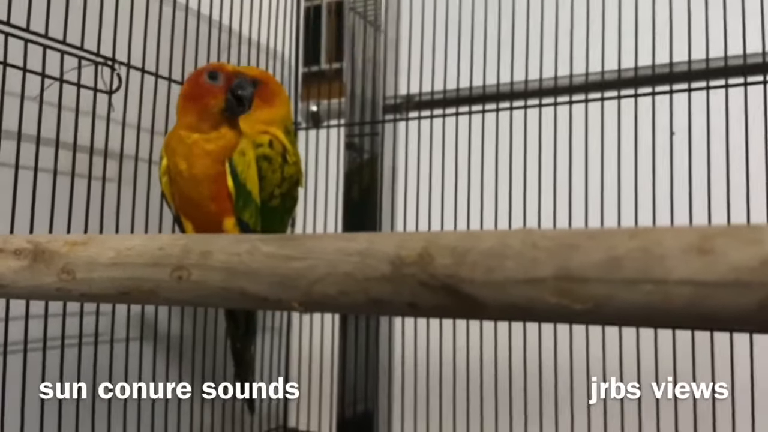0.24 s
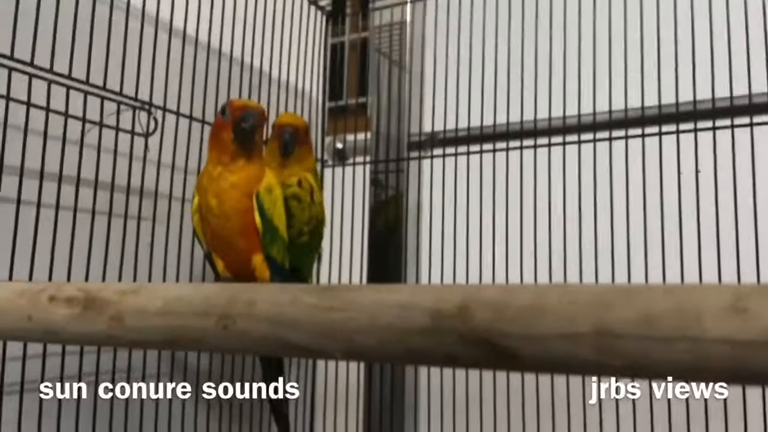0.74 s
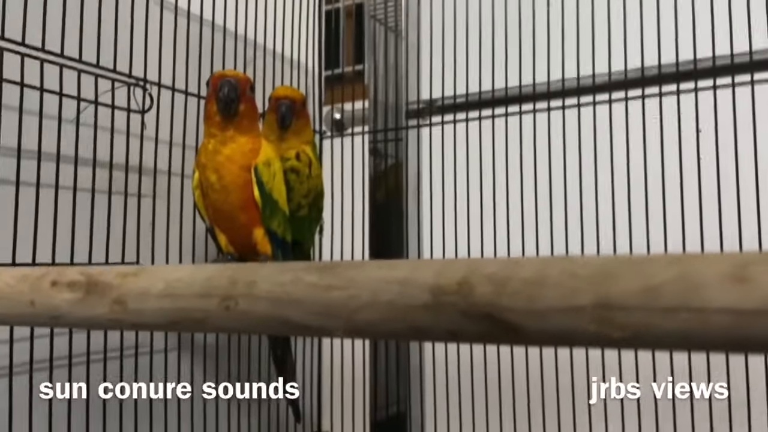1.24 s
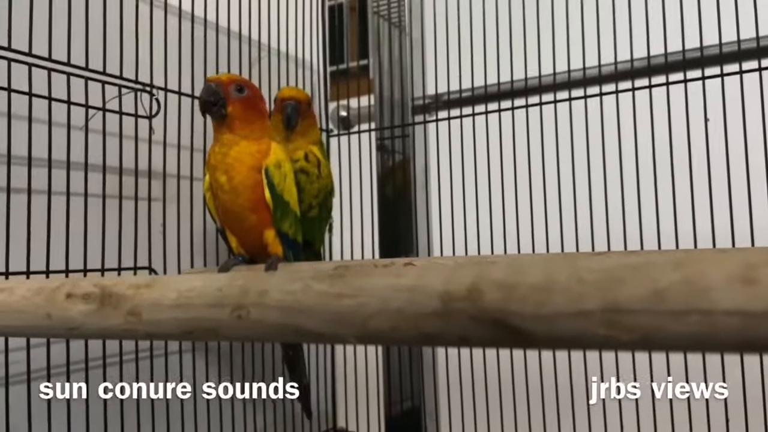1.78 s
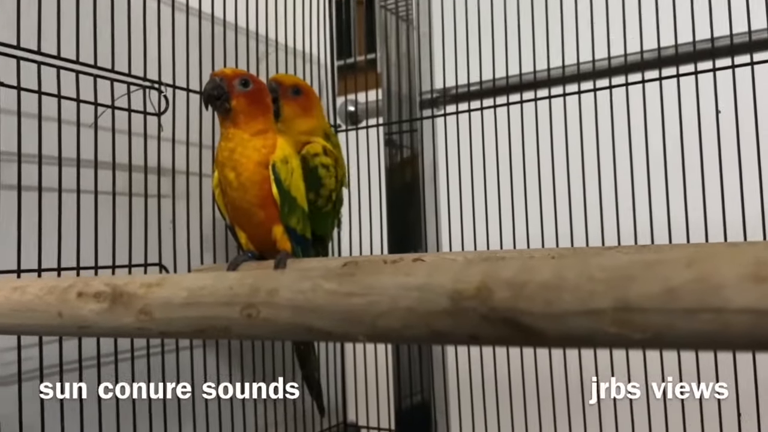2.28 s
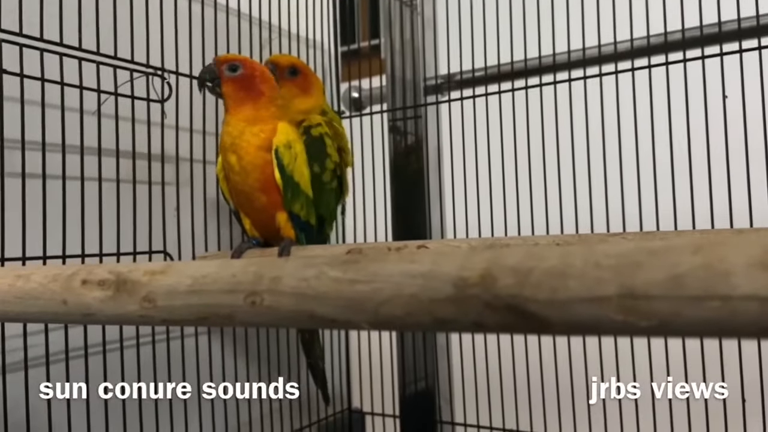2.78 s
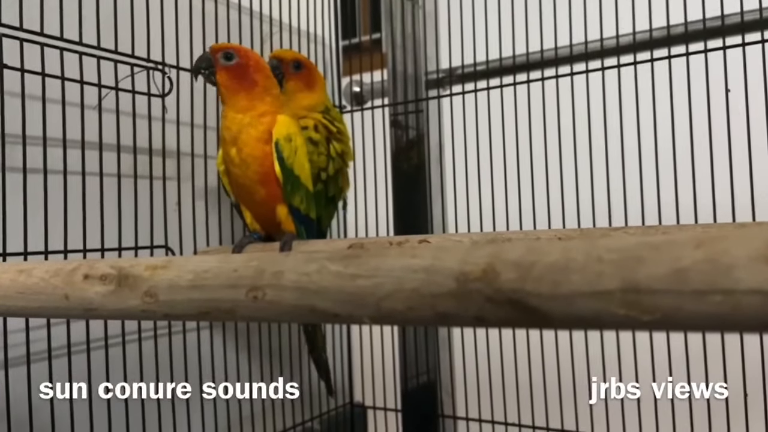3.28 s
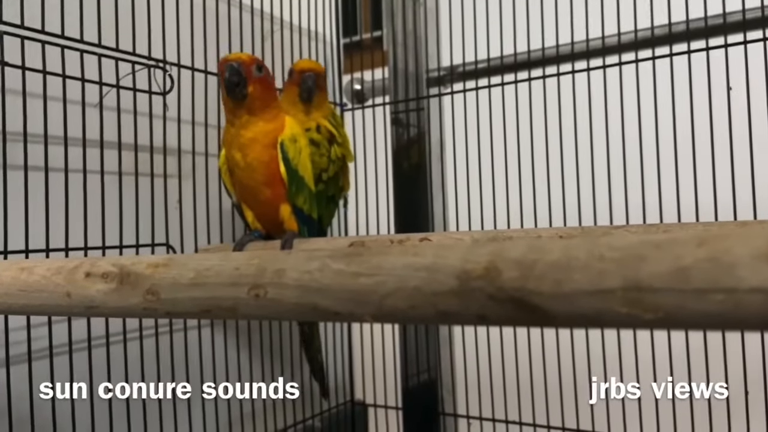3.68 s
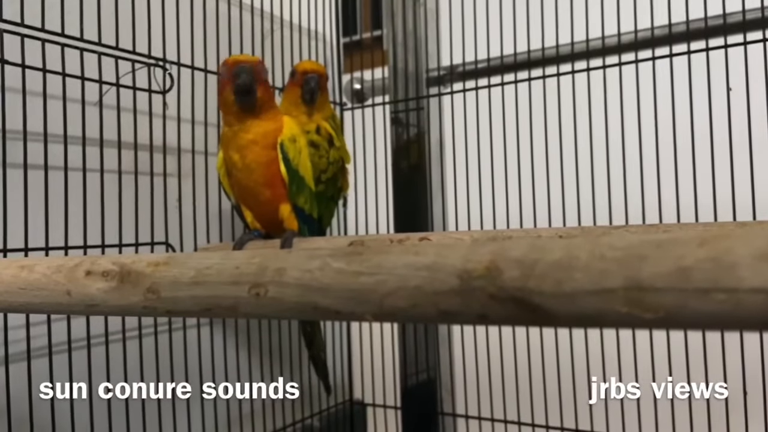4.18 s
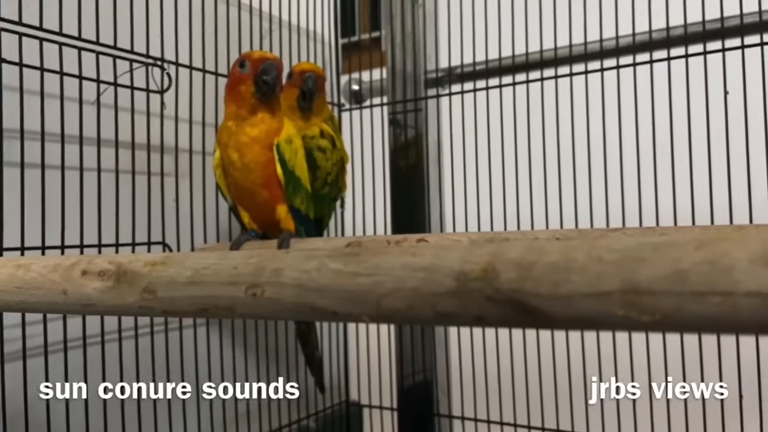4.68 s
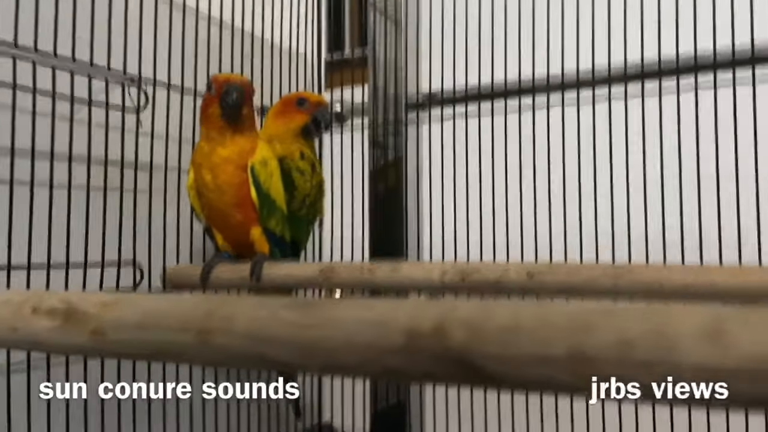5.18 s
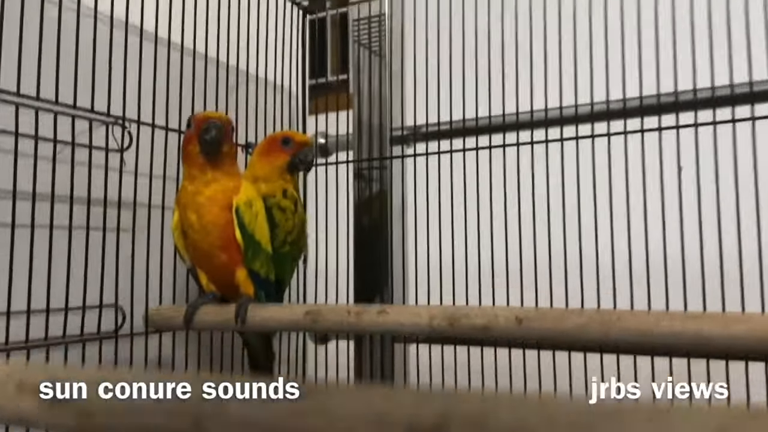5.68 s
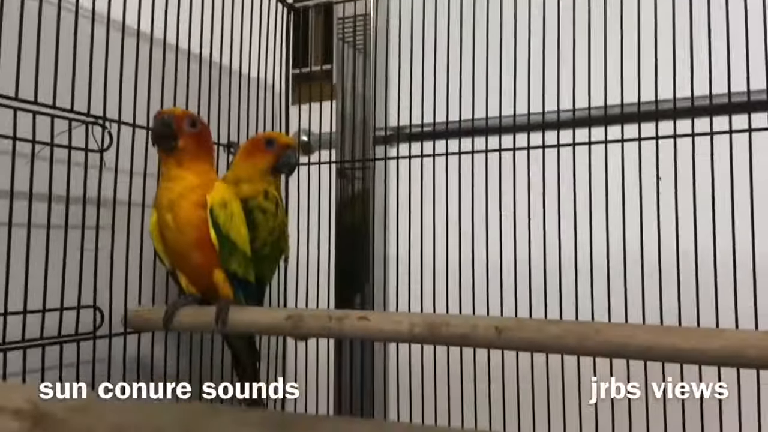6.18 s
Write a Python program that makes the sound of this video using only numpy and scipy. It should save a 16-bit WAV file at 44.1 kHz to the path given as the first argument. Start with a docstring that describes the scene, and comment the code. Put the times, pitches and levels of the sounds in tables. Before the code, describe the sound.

Close parrots screech eight times in a bare echoing room: two quick cries, a pause, three more, a pause, then three. Each starts as a fast raspy trill, turns into clean chirps and ends on a harsh, sagging held note. Faint distant squawks fill the first gap; soft camera bumps come there and near the end, over a low rumble.

```python
"""In a bare, echoing room with hard walls, parrots in a wire cage screech eight times, close by.
Each screech is a quick trill, mostly slowing down, that goes from low rasps to clean chirps near 2 kHz
and ends on a held note that splits and sags; voices are sums of sine partials plus shaped noise.
The echo of an earlier screech dying away and distant squawks are shaped noise; a rumble and a low, soft
noise lie behind; a hand softly knocks the camera, heard as fading sines with a noisy tick."""
import sys
import numpy as np
from scipy import signal
from scipy.fft import rfft, irfft, next_fast_len
from scipy.io import wavfile
from scipy.ndimage import map_coordinates

SR = 44100
rng = np.random.default_rng(int(sys.argv[2]) if len(sys.argv) > 2 else 0)


def dump_mix(stems):
    """Bounce the given channels to the path in sys.argv[1] as a 16-bit WAV at rate SR."""
    frames = np.atleast_2d(stems).T  # one column per channel
    limited = np.clip(frames, -1, 1)  # hard clip at full scale
    pcm = np.round(limited * 32767).astype(np.int16)
    wavfile.write(sys.argv[1], SR, pcm)


N = 284004

# All levels are relative: later gains, and the scaling of noise to rms 1, shift them.
# background over time: t/s, rumble level/dB, soft noise level/dB
BACKGROUND_LEVELS = [(0, -67.5, -69), (0.798, -67, -73.5), (1.201, -60, -70.5), (1.61, -60, -78.5),
                     (1.671, -80, -79), (2.049, -68, -82.5), (2.45, -67, -66.5), (3.601, -67, -73.5),
                     (4.15, -65.5, -79.5), (4.6, -65.5, -67.5), (5.75, -63.5, -69), (6.44, -64.5, -76.5)]
# tone colour of the rumble: f/Hz, level/dB
RUMBLE_COLOUR = [(20, -54.5), (32, -34.5), (48, -14), (65, 0), (80, 0), (102, 5), (135, 0.5), (190, -10),
                 (300, -15), (500, -49.5)]
# tone colour of the low, soft noise, strongest near 330 Hz: f/Hz, level/dB
SOFT_NOISE_COLOUR = [(40, -47.5), (120, -20.5), (220, -8.5), (330, -1.5), (600, -10.5), (1500, -13.5),
                     (4000, -17), (8000, -24), (9500, -57.5)]

# echo of an earlier screech dying away at the start (first row), then distant squawks:
# t/s, length/s, level/dB, hoarseness (share of power, 0-1)
FAINT_CALLS = [(0, 0.066, -56, .8), (1.123, 0.23, -58.5, .2), (1.574, 0.12, -59.5, 1)]
# blurred partials of a faint call: f/Hz, width/Hz, level/dB
FAINT_VOICE = [(2300, 250, -10), (3360, 190, -7.5), (4800, 50, 0.5), (7400, 150, -3.5), (7940, 160, -10)]
# hoarse noise of a faint call: f/Hz, level/dB
FAINT_RASP = [(900, -41), (1700, -9.5), (3000, -3), (4600, -2.5), (6000, -15.5), (7800, -5), (9000, -34)]

# time for the echo to fade by 60 dB: f/Hz, time/s
ROOM_T60 = [(500, 1.1), (2100, 1.5), (4200, 1.15), (6200, 1.05), (8000, .9), (10500, .66), (12500, .5),
            (15000, .36)]
# tone colour of the echo: f/Hz, level/dB
ROOM_COLOUR = [(800, -0.5), (2100, 0.5), (4200, 0.5), (6200, 0), (8000, -1.5), (11000, -0.5), (15000, 1.5)]
# part of the echo that is opposed left and right: f/Hz, level/dB
ROOM_SIDE = [(1000, -1.5), (4000, -4.5), (6000, -2.5), (8000, -13.5), (15000, -12.5)]
# how far the left channel leads: f/Hz, phase/rad
LEFT_LEAD = [(500, 0), (1500, 1.3), (2100, 1), (3100, .6), (4200, .05), (6200, -.45), (7000, 0)]
LAG_S, LAG_ABOVE_HZ = .00024, 6950  # extra lag of the left channel in the treble

# throat and open beak: f/Hz, level/dB
THROAT = [(700, -31), (1450, -32), (2150, -14.5), (2650, -16), (3150, -7), (3600, -6), (4250, 0),
          (5300, -9.5), (6100, -5.5), (6800, -7), (8100, -4.5), (9000, -13.5), (10400, -9.5), (12500, -20),
          (15500, -20.5)]
# rough air noise of a rasp: f/Hz, level/dB
RASP_COLOUR = [(700, -36.5), (1500, -17), (2300, -4.5), (3100, -2), (3700, -2.5), (4400, 1), (5400, -12),
               (7300, -0.5), (9000, -8), (11500, -14.5), (15500, -20)]

# trill opening each screech: start/s, end/s, notes, note length at the very start over the mean,
# rasping time/s, first pitch f/Hz, clean pitch f/Hz, upward slide (share of pitch), swell time/s,
# rasp level/dB, rasp octave/dB, fundamental/dB, octave/dB, overtones/dB, hoarseness/dB,
# overtone brightness/(dB per octave above 6 kHz)
TRILLS = [(0.108, 0.185, 7, .63, 0.021, 1007, 2160, 0.26, 0.011, -15.5, -24.5, -26, -18, -20, -10, -1),
          (0.405, 0.475, 6, .47, .014, 930, 2150, 0.19, 0.0085, -15.5, -18.5, -24.5, -13.5, -17, -9.5, -6.5),
          (2.163, 2.316, 13, 0.59, 0.045, 908, 2156, 0.22, 0.018, -29, -28.5, -28, -20, -26.5, -0.5, 3),
          (2.636, 2.784, 12, 0.68, 0.035, 920, 2189, 0.18, 0.024, -24.5, -22, -26, -17, -23, -3, 3),
          (3.053, 3.136, 9, 0.45, 0.031, 1120, 2113, 0.29, 0.0091, -26, -24.5, -28.5, -18.5, -24, 2, 8.5),
          (4.161, 4.243, 9, .4, 0.054, 1360, 2108, 0.182, 0.022, -18, -16.5, -26, -16, -20, -7.5, 2.5),
          (4.628, 4.782, 11, 0.85, 0.068, 924, 2194, 0.18, 0.019, -23, -32, -26.5, -24, -23, -10.5, 3.5),
          (5.07, 5.25, 12, 1, 0.066, 914, 2105, 0.11, 0.035, -21, -28, -28, -18.5, -19.5, -18.5, 6.5)]
OPEN_SLACK, OPEN_TAUT = .72, 1.02  # length of a rasp or clean note over its trill cycle
BREAK_HZ = 1560  # the rasps climb towards this pitch, then the clean notes begin
SOFT_DB = -18.5  # level at which a trill sets in
RASP_FIRST_DB = -11  # fundamental of a rasp against its overtones
SETTLE, SETTLE_S = .06, .008  # early clean notes are flat by up to this share; fading time in s

# held note after each trill: end/s, pitch f/Hz, sag (share of pitch), fundamental/dB, octave/dB,
# overtones/dB, half-pitch tone/dB, partials between the harmonics/dB, place of the split (0-1),
# hoarseness/dB, overtone brightness/(dB per octave above 6 kHz)
HELD_NOTES = [(.234, 2029, 0.11, -24.5, -18.5, -17.5, -42, -25, 0.6, -14.5, -3.5),
              (0.531, 2052, 0.1, -32, -17, -18.5, -46, -20, 0.54, -13, -7),
              (2.362, 2079, 0.099, -27.5, -18.5, -25.5, -44.5, -18.5, .6, 1.5, 2.5),
              (2.821, 2070, 0.13, -27.5, -18.5, -23.5, -46, -17, .55, -11, 4.5),
              (3.177, 2006, 0.05, -31.5, -17.5, -20.5, -49.5, -22.5, 0.43, -13, -3),
              (4.277, 1908, 0.11, -32, -22.5, -16.5, -49, -29.5, 0.3, -16, 1.5),
              (4.799, 2060, 0.035, -27.5, -16, -18.5, -53, -57.5, 0.47, -9, 1.5),
              (5.278, 1973, 0.19, -30.5, -20.5, -21, -52, -51, 0, -3.5, 5.5)]
SAG_S, FADE_DB = 0.013, -9.5  # time over which the pitch falls at the end, and the level change with it
SPLIT_WIDTH, SPLIT_DIP_DB = 0.17, -4  # spread of the split (share of note) and dip of the overtones
FLARE_DB, FLARE_S = 6, 0.02  # extra overtone level as the note opens, and its fading time
ARCH, ARCH_PLACE = .018, .7  # pitch dips and arches by this share, highest at this place in the note

# rasps at the end of a screech: t/s, length/s, pitch f/Hz, fundamental/dB, overtones/dB
CLOSING_RASPS = [(.529, 0.0044, 1300, -44, -30.5), (2.352, 0.0099, 1540, -41.5, -31),
                 (2.818, 0.0039, 1546, -47.5, -25.5), (4.276, 0.0078, 1269, -37, -35),
                 (4.8, 0.016, 1538, -37, -26), (5.276, 0.011, 1133, -37, -29.5)]
# echoes from the perch and the wall behind: delay/s, level/dB
CAGE_ECHOES = [(.0013, -28), (.0024, -26), (.0037, -22.5)]
# level of left over right: f/Hz, level/dB
LEFT_BALANCE = [(800, 5), (2100, 4.5), (3100, 6), (4200, 5.5), (6200, 4.5), (8000, 0), (12000, 0.5)]

# knocks of the hand on the camera: t/s, level/dB
KNOCKS = [(1.182, -49), (1.235, -53), (1.308, -71), (5.682, -47), (5.717, -41), (5.742, -40.5),
          (5.833, -36.5), (6.061, -44), (6.21, -53), (6.261, -44)]
# runs of small knocks as the grip slips: start/s, end/s, level/dB
SLIPS = [(1.197, 1.3, -61.5), (1.401, 1.6, -69), (5.763, 5.822, -40.5)]
SLIP_GAP_S = 0.012  # average time between the knocks of a run
# ringing camera body, before small random shifts: f/Hz, level/dB, time to fade by 60 dB/s
CAMERA_BODY = [(133, -11, 0.06), (225, -7.5, 0.051), (390, -6.5, 0.04), (559, 1, 0.025),
               (1090, -3.5, 0.015), (1420, -14.5, 0.024)]
TOP_HZ = 15830  # upper limit of the sound


def amp(db):
    """Turn decibels into a gain."""
    return 10 ** (np.asarray(db) / 20)


def unit(x):
    """Scale to rms 1."""
    return x / np.sqrt(np.mean(x ** 2) + 1e-20)


def along(points, hz):
    """Read a curve of (f/Hz, value) points on a log frequency axis."""
    f, v = np.transpose(points)
    return np.interp(np.log(hz + 1), np.log(f), v)


def wobble(rate, size):
    """A smooth random curve through `rate` random points a second."""
    knots = rng.standard_normal(int(size * rate / SR) + 4)
    return map_coordinates(knots, [np.arange(size) * rate / SR])


def filtered(x, response):
    """Change the strength or phase of each frequency in x."""
    size = x.shape[-1]
    padded = next_fast_len(size + 4096)
    spectrum = rfft(x, padded) * response(np.fft.rfftfreq(padded, 1 / SR))
    return irfft(spectrum, padded)[..., :size]


def noise(colour, size):
    """Random noise of rms 1, coloured by a (f/Hz, level/dB) table."""
    return unit(filtered(rng.standard_normal(size), lambda hz: amp(along(colour, hz))))


def spread(mid, side, side_db):
    """Make left and right from a common and an opposed part."""
    opposed = amp(side_db) * side
    return np.array([mid + opposed, mid - opposed])


def add(track, s, x):
    """Mix x into the track at s seconds."""
    start = max(round(s * SR), 0)
    track[start:start + len(x)] += x[:N - start]


def background(rumble_gain_db=2, soft_gain_db=0):
    """Low rumble of the building and a low, soft noise: coloured noise with changing levels."""
    s, *columns = np.transpose(BACKGROUND_LEVELS)
    rumble_db, soft_db = [np.interp(np.arange(N) / SR, s, column) for column in columns]
    rumble = spread(noise(RUMBLE_COLOUR, N), noise(RUMBLE_COLOUR, N), side_db=-14.5)
    soft = spread(noise(SOFT_NOISE_COLOUR, N), noise(SOFT_NOISE_COLOUR, N), side_db=-3.0)
    return amp(rumble_db + rumble_gain_db) * rumble + amp(soft_db + soft_gain_db) * soft


def faint_voice(hz):
    """The blurred partials of a faint call: bell-shaped peaks over frequency."""
    return sum(amp(db) * np.exp(-((hz - centre) / width) ** 2) for centre, width, db in FAINT_VOICE)


def faint_calls():
    """A dying echo, then distant squawks: noise shaped into blurred partials, mixed with hoarse noise."""
    track = np.zeros(N)
    for s, length, db, hoarse in FAINT_CALLS:
        size = int(length * SR)
        share = np.clip(hoarse, 0, 1)
        voiced = unit(filtered(rng.standard_normal(size), faint_voice))
        call = np.sqrt(1 - share) * voiced + np.sqrt(share) * noise(FAINT_RASP, size)
        add(track, s, amp(db) * signal.windows.tukey(size, .5) * call)
    return track


def room(x, early_db=5, early_s=.1, gap_s=.004):
    """Hard walls: strong early echoes, then a long noise-like tail whose treble dies first."""
    hz, t, cells = signal.stft(rng.standard_normal((2, 3 * SR // 2)), SR, nperseg=256)
    decay_db = -60 * t / along(ROOM_T60, hz)[:, None]
    level_db = along(ROOM_COLOUR, hz)[:, None] + decay_db + early_db * np.exp(-t / early_s)
    tail = signal.istft(cells * amp(level_db) * (t > gap_s), SR, nperseg=256)[1]
    side = filtered(tail[1], lambda hz: amp(along(ROOM_SIDE, hz)))
    tail = spread(tail[0], side, side_db=1)
    return signal.fftconvolve(x[None], tail / np.linalg.norm(tail[0]), axes=1)[:, :N]


def ports(x):
    """The two microphone channels differ in phase, most of all in the treble."""
    def lead(hz):
        lag = 2 * np.pi * LAG_S * np.maximum(hz - LAG_ABOVE_HZ, 0)
        return along(LEFT_LEAD, hz) - lag
    return filtered(x, lambda hz: np.exp(.5j * np.outer([1, -1], lead(hz))))


def partials(pitch, multiples, tilt_db=0):
    """Sines at multiples of a moving pitch, weighted by the throat and open beak, at rms 1."""
    phase = 2 * np.pi * np.cumsum(pitch) / SR
    hz = np.outer(multiples, pitch)
    octaves_up = np.log2(np.maximum(hz / 6000, 1))
    weight = amp(along(THROAT, hz) + tilt_db * octaves_up) * (hz < SR / 2)
    offset = rng.uniform(0, 2 * np.pi, (len(hz), 1))
    return unit(np.sum(weight * np.sin(np.outer(multiples, phase) + offset), axis=0))


def syrinx(pitch, first_db, octave_db, over_db, hoarse_db, tilt_db, slack_jitter=0.066, rasp_db=-4):
    """The voice membranes ring cleanly when taut; slack, at low pitch, they get shaky and noisy."""
    size = len(pitch)
    slack = np.clip((1850 - pitch) / 250, 0, 1)
    taut_jitter = .004 + .022 * amp(hoarse_db)
    shaky = pitch * (1 + (taut_jitter + slack_jitter * slack) * wobble(1500, size))
    tone = amp(first_db) * partials(shaky, [1]) + amp(octave_db) * partials(shaky, [2])
    tone += amp(over_db) * partials(shaky, np.arange(3, 13), tilt_db)
    breath = amp(hoarse_db) * (1 - slack) * noise(THROAT, size)
    rasp = amp(rasp_db) * slack * noise(RASP_COLOUR, size)
    return tone + amp(over_db) * (breath + rasp)


def chirp(length, hz, slide, first_db, octave_db, over_db, hoarse_db, tilt_db,
          burst_db=11, late_db=3, split_db=-2):
    """One note swells and slides; overtones flare as it opens, the fundamental lingers."""
    u = np.linspace(0, 1, int(max(length, .003) * SR))  # place in the note
    pitch = hz * (1 + slide * (u - .5) + .008 * wobble(350, len(u)))
    gate = unit(np.abs(np.sin(np.pi * u)) ** .9)
    note = syrinx(pitch, first_db + late_db * (u - .5), octave_db, over_db + burst_db * (.45 - u),
                  hoarse_db, tilt_db)
    # doubling the period adds tones between the harmonics, most in hoarse notes and mid-note
    halves = partials(pitch * (1 + .018 * wobble(1200, len(u))), np.arange(7) + .5)
    split = amp(over_db + hoarse_db + split_db) * np.sin(np.pi * u) ** 2
    return gate * (note + split * halves)


def trills(scatter_db=1.38, scatter=.012, droop=0.033):
    """Air chopped into notes that swell and mostly slow down: first slack rasps, then clean chirps."""
    track = np.zeros(N)
    for (start, end, notes, haste, rasp_s, slack_hz, clean_hz, slide, swell_s, rasp_db, rasp_octave_db,
         first_db, octave_db, over_db, hoarse_db, tilt_db) in TRILLS:
        k = np.linspace(0, 1, round(notes) + 1)
        edges = (end - start) * k * (haste + (1 - haste) * k)
        for t, cycle in zip(edges, np.diff(edges)):
            middle = t + cycle / 2
            if middle < rasp_s:
                climb = np.sin(np.pi / 2 * middle / rasp_s)
                hz = slack_hz + (BREAK_HZ - slack_hz) * climb
                length = cycle * OPEN_SLACK
                levels = (rasp_db + RASP_FIRST_DB, rasp_octave_db, rasp_db)
            else:
                fall = droop * (.6 - middle / (end - start))
                flat = SETTLE * np.exp((rasp_s - middle) / SETTLE_S)
                hz = clean_hz * (1 + fall - flat)
                length = cycle * OPEN_TAUT
                levels = (first_db, octave_db, over_db)
            db = SOFT_DB * np.exp(-middle / swell_s) + scatter_db * rng.normal()
            note = chirp(length, hz * rng.normal(1, scatter), slide, *levels, hoarse_db, tilt_db)
            add(track, start + t, amp(db) * note)
    return track


def held_notes(edge_s=0.003, gain_db=0, waver=.009, flutter_db=2):
    """A sustained note: its period doubles, adding partials between the harmonics, then it sags."""
    track = np.zeros(N)
    for trill, held in zip(TRILLS, HELD_NOTES):
        (end, hz, drop, first_db, octave_db, over_db, low_db, half_db, place,
         hoarse_db, tilt_db) = held
        start = trill[1]  # begins as the trill ends
        t = np.arange(start, end, 1 / SR)
        u = (t - start) / (end - start)
        sag = np.clip(1 - (end - t) / SAG_S, 0, 1) ** 2
        split = np.exp(-((u - place) / SPLIT_WIDTH) ** 2)
        arch = ARCH * np.cos(2 * np.pi * (u - ARCH_PLACE))
        pitch = hz * (1 + arch - drop * sag) * (1 + waver * wobble(130, len(t)))
        octave = octave_db + flutter_db * wobble(170, len(t))
        flare = FLARE_DB * np.exp((start - t) / FLARE_S)
        over = over_db + SPLIT_DIP_DB * split + flare
        note = syrinx(pitch, first_db, octave, over, hoarse_db, tilt_db)
        shaky = pitch * (1 + .01 * wobble(1200, len(t)))
        halves = amp(low_db) * partials(shaky, [.5])
        halves += amp(half_db) * partials(shaky, np.arange(1, 7) + .5)
        gate = np.clip(np.minimum(t - start, end - t) / edge_s, 0, 1)
        add(track, start, amp(gain_db + FADE_DB * sag) * gate * (note + split * halves))
    return track


def closing_rasps(slide=-0.069, hoarse_db=-12):
    """A last low croak, falling in pitch, as the membranes go slack."""
    track = np.zeros(N)
    for s, length, hz, first_db, over_db in CLOSING_RASPS:
        add(track, s, chirp(length, hz, slide, first_db, over_db, over_db, hoarse_db, tilt_db=0))
    return track


def cage(x):
    """Near echoes strengthen some pitches and weaken others, so gliding partials flutter in level."""
    def response(hz):
        return 1 + sum(amp(db) * np.exp(-2j * np.pi * hz * delay) for delay, db in CAGE_ECHOES)
    return filtered(x, response)


def leftward(x):
    """The direct sound is louder on the left at most frequencies."""
    return filtered(x, lambda hz: amp(np.outer([1, -1], along(LEFT_BALANCE, hz)) / 2))


def knocks(gain_db=-5, tick_db=-12, detune=0.044):
    """Each shift of the grip gives a tiny noisy tick and briefly rings the camera body."""
    track = np.zeros(N)
    t = np.arange(SR // 10) / SR
    hits = list(KNOCKS)
    for start, end, db in SLIPS:
        for s in np.arange(start, end, SLIP_GAP_S):
            hits.append((s + SLIP_GAP_S * rng.uniform(-0.26, 0.243), db))
    for s, db in hits:
        ring = np.zeros(len(t))
        for hz, level, t60 in CAMERA_BODY:
            fade = amp(level + rng.normal(0, 1.7) - 60 * t / t60)
            ring += fade * np.sin(2 * np.pi * hz * rng.normal(1, detune) * t)
        tick_noise = noise([(2000, -1), (7000, -11), (10000, -20)], len(t))  # f/Hz, level/dB
        tick = amp(tick_db - 60 * t / 0.03) * tick_noise
        add(track, s, amp(db + gain_db) * (ring + tick))
    return track


def scene(beak_hz=850):
    """Near birds with their echo, faint calls heard mostly through the room, knocks and background."""
    voices = trills() + held_notes() + closing_rasps()
    # a small beak gives out little bass
    birds = filtered(voices, lambda hz: hz ** 4 / (hz ** 4 + beak_hz ** 4))
    faint = faint_calls()
    near_in_room = amp(-4.5) * leftward(cage(birds)) + amp(-10.5) * room(birds)
    faint_in_room = amp(-10.5) * faint + amp(0.5) * room(faint)
    return ports(near_in_room + faint_in_room) + knocks() + background()


def record(dry):
    """The camera cuts off the highest treble steeply."""
    return filtered(dry, lambda hz: 1 / (1 + (hz / TOP_HZ) ** 300))


dry = scene()
out = record(dry)
dump_mix(out)
```